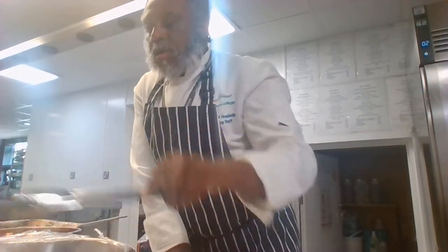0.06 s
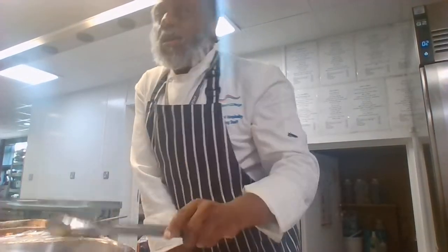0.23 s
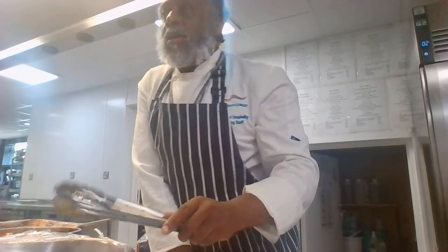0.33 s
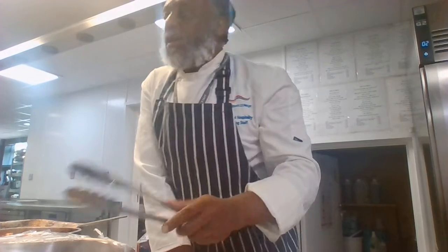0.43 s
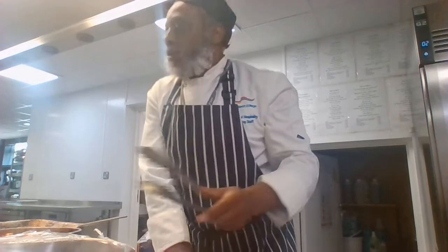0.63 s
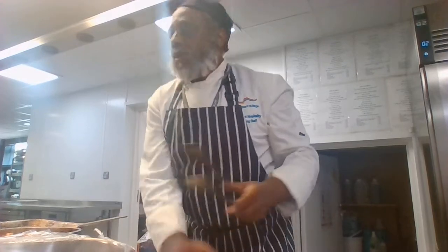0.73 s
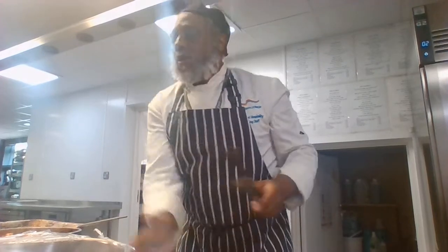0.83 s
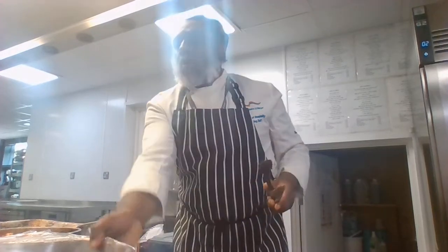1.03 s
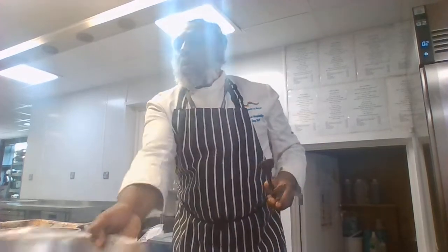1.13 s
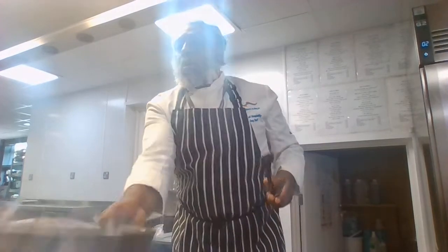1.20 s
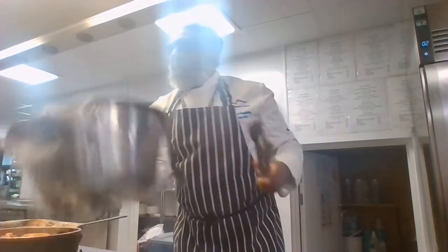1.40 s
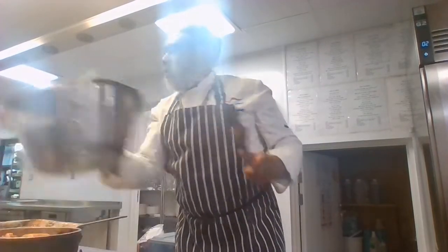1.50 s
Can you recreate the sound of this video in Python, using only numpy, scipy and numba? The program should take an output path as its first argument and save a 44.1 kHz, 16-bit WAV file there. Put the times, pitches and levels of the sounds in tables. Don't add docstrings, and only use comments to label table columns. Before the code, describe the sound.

Chicken pieces sizzling and crackling in hot oil, with one loud metallic tongs knock on the pan

```python
import sys
import numpy as np
from scipy import signal
from scipy.io import wavfile
from scipy.ndimage import uniform_filter1d, minimum_filter1d
from numba import njit

SR = 44100
rng = np.random.default_rng(int(sys.argv[2]) if len(sys.argv) > 2 else 0)


def boost(x):
    u = np.asarray(x, float) / 20
    return 10 ** u


def dump(signal):
    limited = np.clip(np.atleast_2d(signal).T, -1, 1)
    pcm = np.round(limited * 32767).astype(np.int16)
    wavfile.write(sys.argv[1], SR, pcm)


N = 68355

POP_DB, POP_CYCLES, POP_RISE = -2, 49, 0.026
CLUSTER_DB, CLUSTERS_PER_S = 1.2, 60
STEEL_ECHO_DB = -9
# (time [s], fizz and crackle level [dB], fine spit level [dB])
BOIL_STRENGTH = [(0, 7.5, 1), (.05, 5, 2), (.12, 0, -3), (.2, 6, -2), (.3, 2, -5), (.42, 3, -1),
                 (.55, 1, -3), (.68, 7, 2), (.74, 1.5, 2), (.83, 0, -3), (.852, 0, 9.5), (.92, 4, 1),
                 (1.0, -3, -6), (1.09, 1, 0), (1.19, -2.5, -11), (1.25, 2, -1.5), (1.4, 1, 3.5),
                 (1.55, 1, 2.5)]
# (time [s], peak level [dB], pitch [Hz])
BIG_POPS = [(0.0124, -19.5, 5900), (0.0254, -24, 4560), (0.383, -16.5, 6300), (0.4174, -27, 7190),
            (0.4269, -17, 7250), (0.4537, -29, 7300), (0.5112, -44, 5330), (0.5392, -29, 6900),
            (0.5785, -24, 7780), (0.6011, -24, 5200), (0.6526, -24, 7640), (0.6644, -33, 4970),
            (0.678, -19, 7050), (0.7561, -33, 6670), (0.7694, -23, 7470), (0.805, -23, 6330),
            (0.824, -21.5, 7500), (0.868, -22, 6070), (0.8838, -23, 7140), (0.9, -34, 4430),
            (0.9552, -28, 5560), (1.068, -30, 4380), (1.0918, -22, 8150), (1.2444, -32, 4410),
            (1.3499, -53, 6600), (1.3878, -21, 6800), (1.4683, -23, 5360), (1.492, -20.5, 6300)]


def sizzle():
    t = np.arange(N) / SR
    boil_s, fizz_db, spit_db = np.array(BOIL_STRENGTH).T

    def surge(db):
        return boost(np.interp(t, boil_s, db) + CLUSTER_DB * walk(CLUSTERS_PER_S))

    fizz = bubbles(per_s=2500, hz=6300, octaves=0.35, cycles=36, spread_db=5.5, db=-47)
    crackle = bubbles(per_s=800, hz=2596, octaves=0.57, cycles=12, spread_db=1.5, db=-48.5)
    spit = bubbles(per_s=3200, hz=15200, octaves=0.17, cycles=20, spread_db=4.5, db=-48.5)
    oil = surge(fizz_db) * (fizz + crackle) + surge(spit_db) * spit

    pop_s, pop_db, hz = np.array(BIG_POPS, float).T
    t60 = POP_CYCLES / hz
    oil = oil + ring(N, pop_s, hz, t60, boost(pop_db + POP_DB), 0.15, POP_RISE * t60)
    return echo(oil, STEEL_ECHO_DB)


def bubbles(per_s, hz, octaves, cycles, spread_db, db):
    u = rng.random((9000, 4))
    start = np.cumsum(-np.log(u[:, 0])) / per_s - .01
    pitch = np.clip(hz * 2 ** (octaves * 2.36 * (u[:, 1] + u[:, 3] - 1)), 300, .44 * SR)
    size = boost(spread_db * np.minimum(-np.log(u[:, 2]), 3.5))
    t60 = cycles / pitch
    return level(ring(N, start, pitch, t60, size, 0.17, POP_RISE * t60), db)


PAN_DB, RIM_DB, LIGHT_PAN_DB = -4, -5.5, -17
TWIN_DB, TWIN_SHARE = -5.5, .012
CHATTER_S, RISE_S = .014, .0008
SHIMMER_LOW_HZ, SHIMMER_HIGH_HZ = 850, 8300
SHIMMER_DB, SHIMMER_T60_S, SHIMMER_TILT_DB = -24.5, 0.12, -1.5
RATTLE_DB, RATTLE_HZ, RATTLE_WIDTH_HZ, RATTLE_T60_S = -15, 4200, 5500, 0.087
THUD_DB, THUD_HZ, THUD_T60_S = -3, 460, .085
TICK_DB, TICK_HZ, TICK_T60_S = -24, 5500, .016
KNOCK_ECHO_DB = -7.5
# (time [s], peak level [dB])
TONG_KNOCKS = [
    (0.1893, -29),
    (0.2399, 0),
    (0.6779, -30),
]
BOWL_HZ = [274.5, 286.5, 463, 541, 694, 735, 817, 1086, 1233, 1313, 1378, 1490, 1682, 1788]
# (level [dB], time to fall 60 dB [s])
BOWL_MODES = [(-8, 0.52), (-6, 0.53), (-12.5, 0.12), (-8.5, 0.11), (-8, 0.36), (-3.5, 0.3), (-12.5, 0.33),
              (2.5, 0.14), (-6, 0.29), (-4, 0.25), (-18, .2), (-13.5, 0.49), (-16, 0.18), (-10.5, 0.22)]
RIM_TONGS_HZ = [2191, 2412, 2509, 2665, 2760, 2978, 3155, 3408, 3892, 4285, 4877, 5033, 5572, 6200]
# (level [dB], time to fall 60 dB [s])
RIM_TONGS_MODES = [(-16.5, 0.22), (-8.5, 0.21), (-4.5, 0.22), (-3, 0.12), (0.5, 0.098), (-9, 0.18),
                   (-10, .2), (-8, 0.1), (-11, 0.06), (-9, 0.17), (-14, .1), (-17, .12), (-16, 0.11),
                   (2.5, 0.035)]


def knocks():
    out, t = np.zeros(N), np.arange(N) / SR
    noise = rng.standard_normal((3, N))
    rattle = level(band(noise[0], RATTLE_HZ, RATTLE_WIDTH_HZ), RATTLE_DB)
    thud = level(band(band(noise[1], THUD_HZ, THUD_HZ), THUD_HZ, THUD_HZ), THUD_DB)
    tick = level(band(noise[2], TICK_HZ, 2 * TICK_HZ), TICK_DB)

    u = rng.random((200, 4))
    high = SHIMMER_LOW_HZ + (SHIMMER_HIGH_HZ - SHIMMER_LOW_HZ) * u[:, 0] ** 1.3
    high_t60 = SHIMMER_T60_S * (3000 / high) ** .3 * (.7 + .6 * u[:, 2])
    high_db = SHIMMER_DB + SHIMMER_TILT_DB * np.log2(high / 3000) + 6 * (u[:, 3] - .5)

    for knock_s, db in TONG_KNOCKS:
        light = db < -15
        short = .4 if light else 1
        bowl = (BOWL_HZ, BOWL_MODES, PAN_DB + LIGHT_PAN_DB * light)
        rim = (RIM_TONGS_HZ, RIM_TONGS_MODES, RIM_DB)
        for pitches, modes, body_db in (bowl, rim):
            hz = np.array(pitches, float)
            mode_db, t60 = np.array(modes, float).T
            start, rise = knock_s + 0 * hz, RISE_S + 0 * hz
            size = boost(db + body_db + mode_db)
            out += ring(N, start, hz, t60 * short, size, 0., rise)
            twin = hz * (1 + TWIN_SHARE * (2 * u[:len(hz), 3] - 1))
            twin_size = -size * boost(TWIN_DB) * (hz > 400)
            out += ring(N, start, twin, t60 * short * .5, twin_size, 0., rise)

        chatter = knock_s + short * CHATTER_S * u[:, 1] ** 2
        clatter = ring(N, chatter, high, short * high_t60, boost(db + high_db), 0., RISE_S + 0 * high)
        since = np.maximum(t - knock_s, 0)

        def fade(t60):
            return (1 - np.exp(-since / RISE_S)) * boost(-60 * since / t60)

        clatter += boost(db) * (rattle * fade(RATTLE_T60_S) + thud * fade(THUD_T60_S))
        clatter += boost(db) * light * tick * fade(TICK_T60_S)
        out += echo(clatter, KNOCK_ECHO_DB)
    return out


@njit
def ring(n, start, hz, t60, size, glide, rise):
    out = np.zeros(n)
    for k in range(len(start)):
        i = int(start[k] * SR) + 1
        p = np.exp((2j * np.pi * hz[k] - np.log(1000) / t60[k]) / SR)
        turn = np.exp(2j * np.pi * hz[k] * glide / (t60[k] * SR * SR))
        z = size[k] * p ** (i - start[k] * SR)
        shut, q = 1., np.exp(-1 / (rise[k] * SR))
        for j in range(max(i, 0), min(n, i + int(t60[k] * SR))):
            shut *= q
            out[j] += z.imag * (1 - shut)
            z, p = z * p, p * turn
    return out


def echo(x, db):
    lag = int(.0105 * SR)
    return x + boost(db) * np.concatenate([x[:lag][::-1], x[:-lag]])


@njit
def walls(x, lags, gain, damp):
    line, soft, out = np.zeros((8, 4096)), np.zeros(8), np.zeros(len(x))
    for i in range(len(x)):
        total = 0.
        for k in range(8):
            soft[k] += (1 - damp) * (gain[k] * line[k, (i - lags[k]) & 4095] - soft[k])
            total += soft[k]
            out[i] += soft[k] * (1 - 2 * (k % 2))
        for k in range(8):
            line[k, i & 4095] = x[i] + soft[k] - total / 4
    return out


HOOD_DB, SWELL_DB, FLICKER_DB = -32, .5, 0.94
# (pitch [Hz], level per Hz [dB])
HOOD_AIR = [
    (40, -59),
    (70, -24.5),
    (150, 1),
    (390, -6.5),
    (520, -16),
    (1260, -17),
    (3400, -37.5),
    (7600, -23.5),
    (12000, -38.5),
]
# (pitch [Hz], width [Hz], level [dB])
DUCT_BOOMS = [
    (133, 28.7, -39.5),
    (253, 13, -56),
    (391, 20, -49),
    (1288, 6, -51.5),
]


def hood():
    air, swell = 0, walk(3.4)
    air_hz, air_db = np.array(HOOD_AIR).T
    for hz in 40 * 2 ** np.arange(0, 8.7, 1 / 3):
        db = np.interp(np.log(hz), np.log(air_hz), air_db)
        db = db + SWELL_DB * swell + FLICKER_DB * walk(11.64)
        air = air + boost(db) * band(band(rng.standard_normal(N), hz, hz / 3), hz, hz / 3)
    ducts = sum(level(band(rng.standard_normal(N), hz, width), db) for hz, width, db in DUCT_BOOMS)
    return level(air, HOOD_DB) + ducts


def level(x, db):
    return x * boost(db) / np.sqrt(np.mean(x ** 2))


def band(x, hz, width):
    return signal.lfilter(*signal.iirpeak(min(hz, .45 * SR), hz / width, fs=SR), x)


def walk(rate):
    k = int(SR / rate)
    steps = np.repeat(rng.standard_normal(N // 50), k)[:N + k]
    return 1.59 * uniform_filter1d(uniform_filter1d(steps, k), k)[:N]


ROOM_DB, ROOM_T60_S, ROOM_DAMP = -17.5, .33, .35


def scene():
    near = sizzle() + knocks()
    lags = rng.integers(400, 1800, 8)
    room = walls(near + 1e-18, lags, boost(-60 * lags / SR / ROOM_T60_S), ROOM_DAMP)
    return (near + boost(ROOM_DB) * room + hood())[None]


LOW_CUT_HZ = 68
LIMIT_DB, LIMIT_RATIO, ATTACK_S, RELEASE_S = -3.7, 12, .0005, .012
CEILING, LOPSIDED = 1.3, .12


@njit
def limiter(x, top, ratio, attack, release):
    gain, e = np.ones(len(x)), 0.
    for i in range(len(x)):
        e += (abs(x[i]) - e) * (attack if abs(x[i]) > e else release)
        if e > top:
            gain[i] = (top / e) ** (1 - 1 / ratio)
    return gain


def top_cut(x):
    return signal.sosfilt(signal.butter(12, 15900, fs=SR, output="sos"), x)


def record(dry):
    x = signal.sosfilt(signal.butter(2, LOW_CUT_HZ, "high", fs=SR, output="sos"), dry[0])
    ahead = int(ATTACK_S * SR)
    gain = limiter(x, boost(LIMIT_DB), 1. * LIMIT_RATIO, 1., 1 / (RELEASE_S * SR))
    x = x * uniform_filter1d(minimum_filter1d(gain, 2 * ahead), ahead)
    x = CEILING * np.tanh((x + LOPSIDED * x ** 2) / CEILING)
    return top_cut(x[None])


dry = scene()
out = record(dry)
dump(out)
```